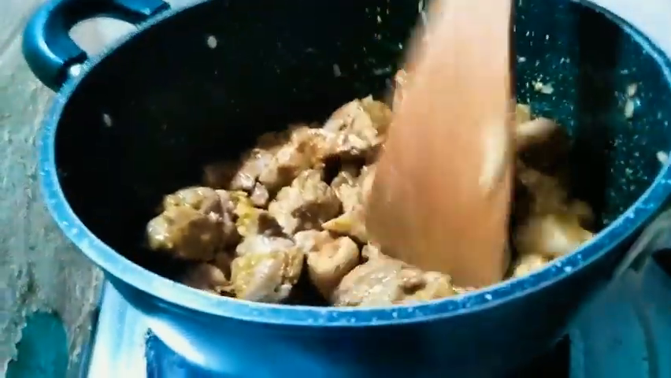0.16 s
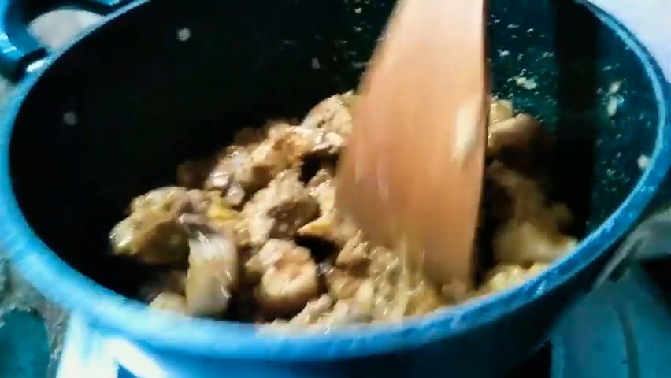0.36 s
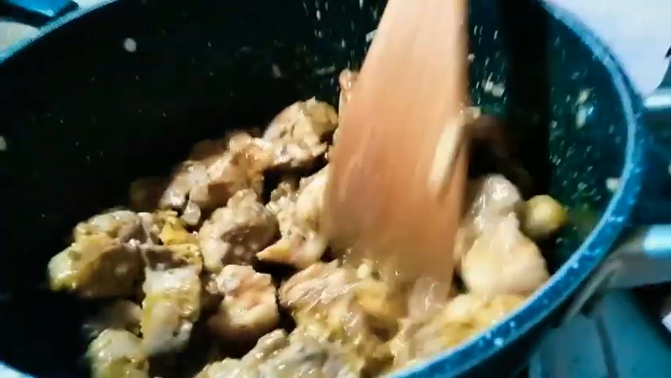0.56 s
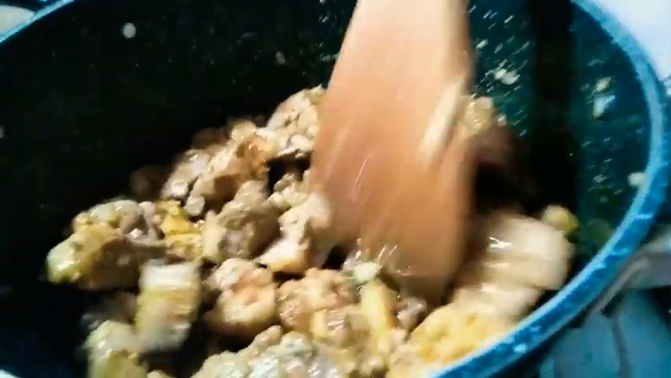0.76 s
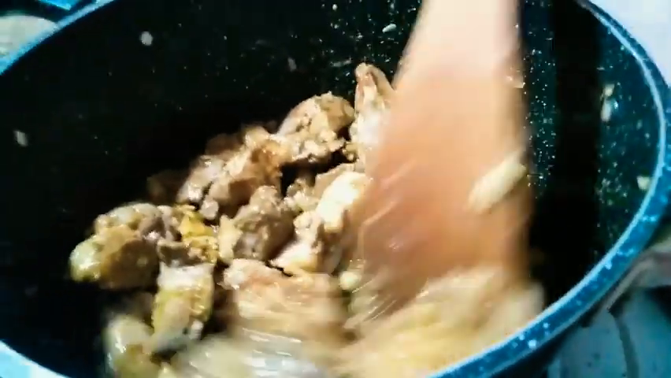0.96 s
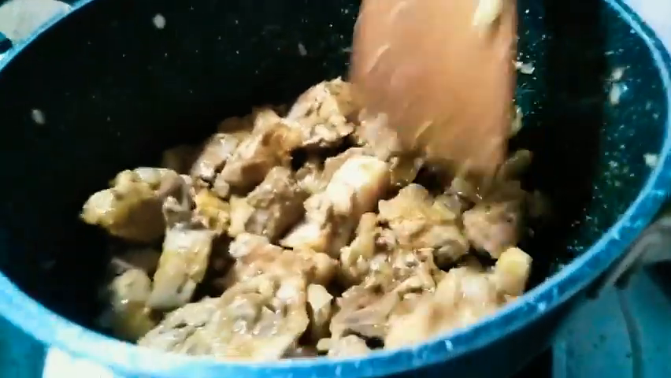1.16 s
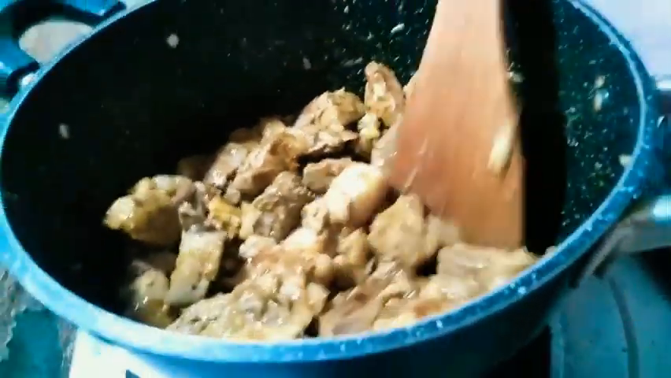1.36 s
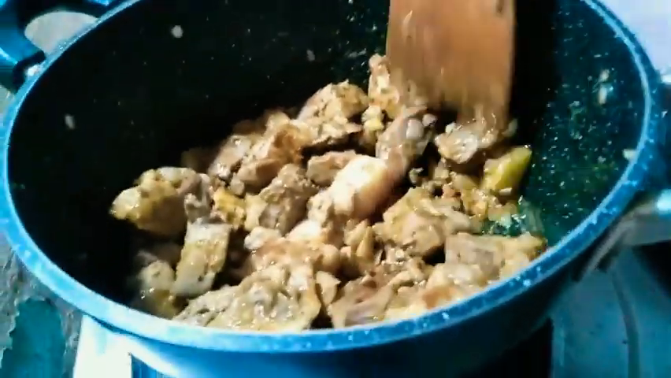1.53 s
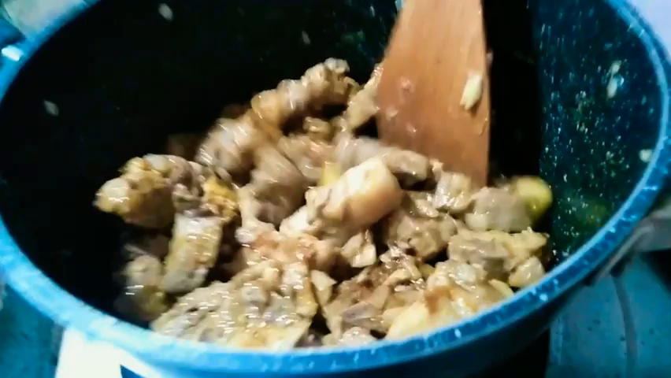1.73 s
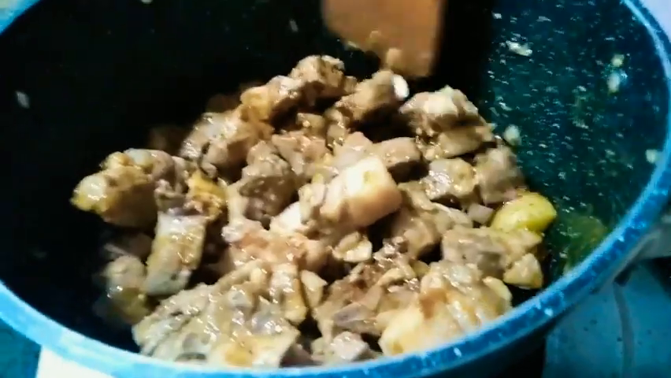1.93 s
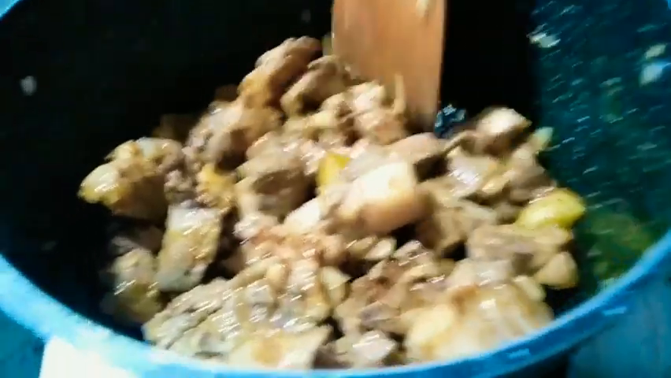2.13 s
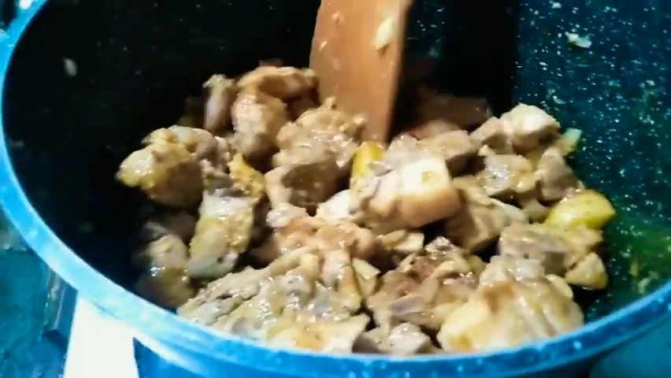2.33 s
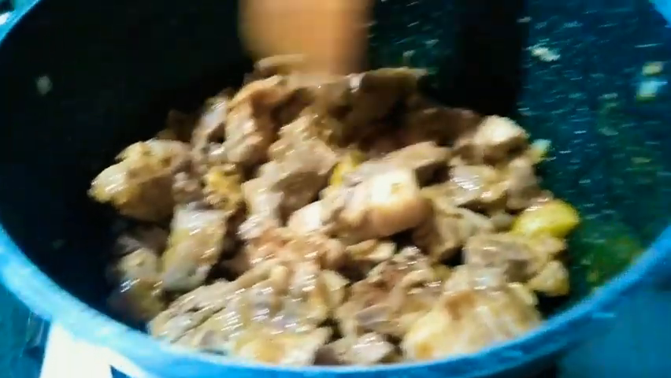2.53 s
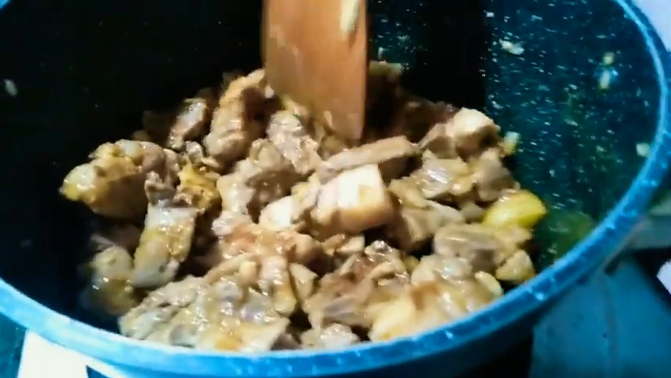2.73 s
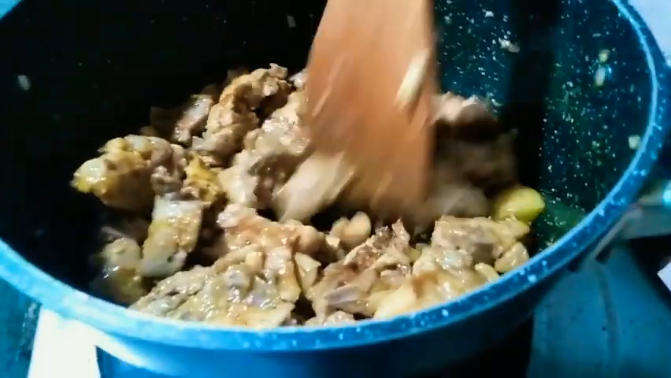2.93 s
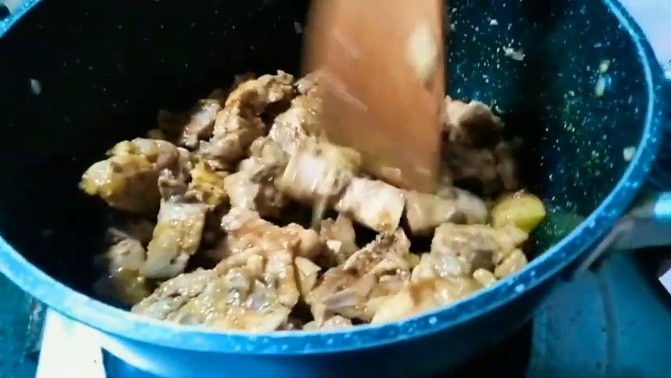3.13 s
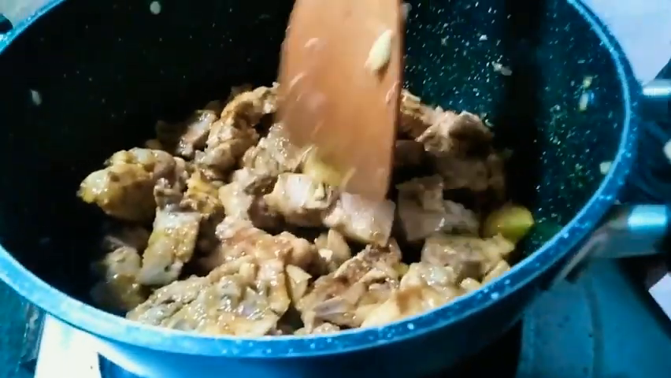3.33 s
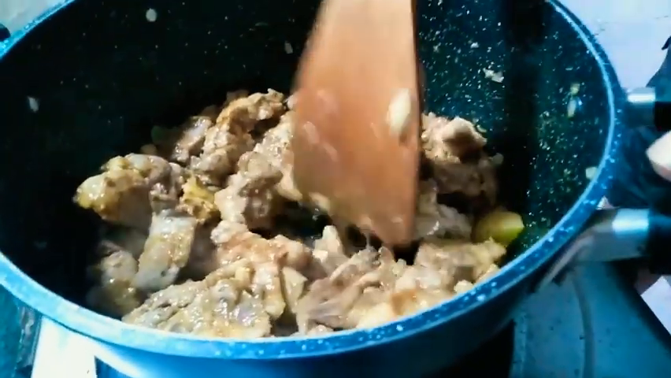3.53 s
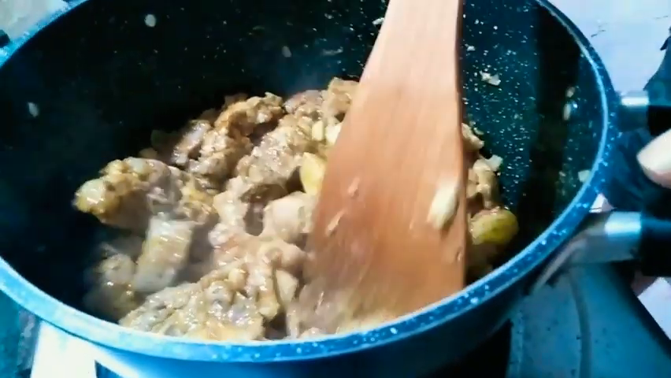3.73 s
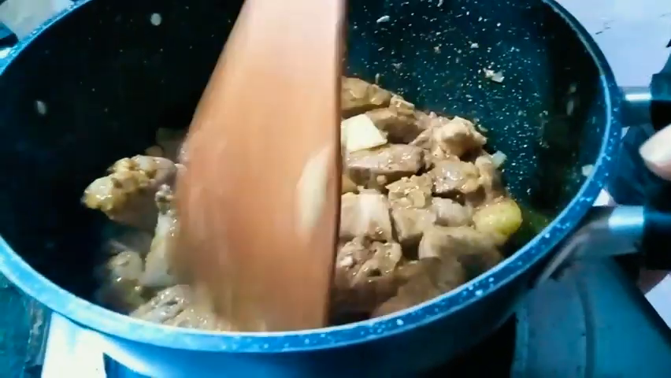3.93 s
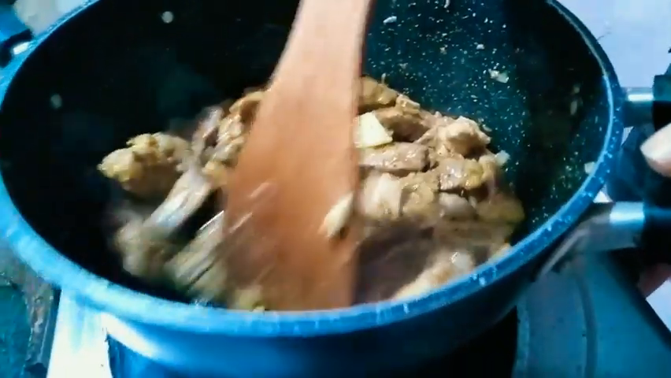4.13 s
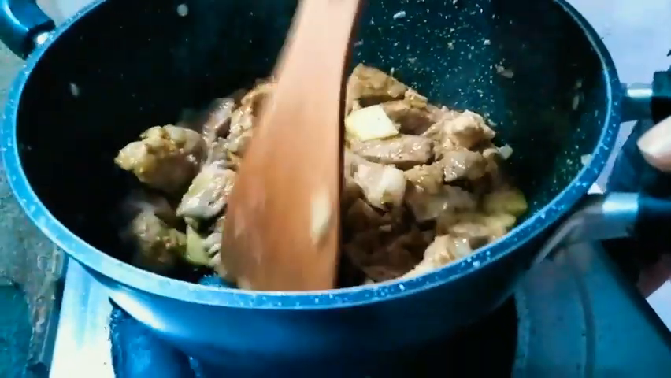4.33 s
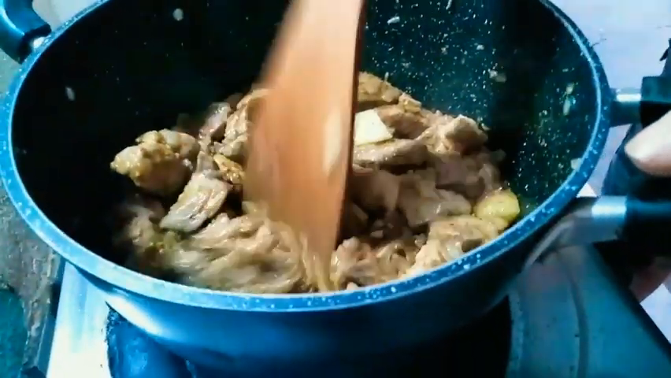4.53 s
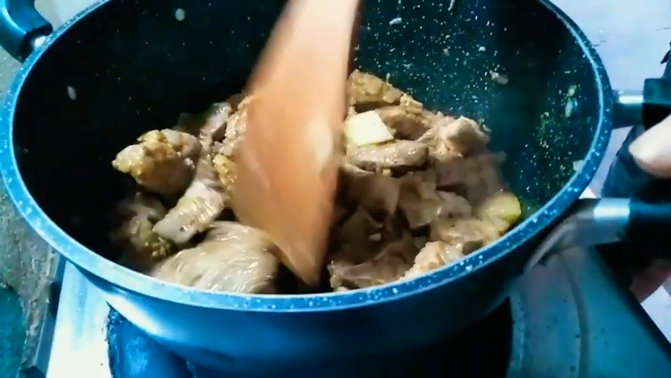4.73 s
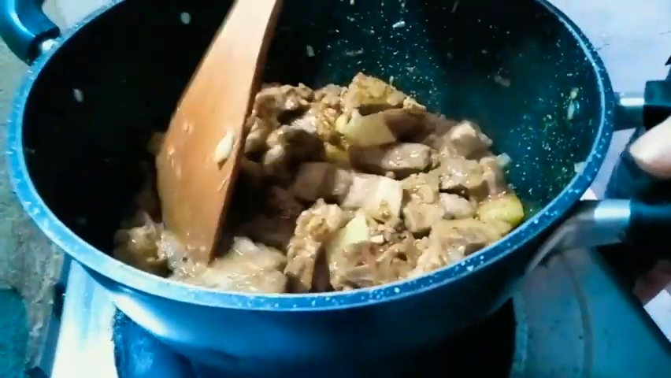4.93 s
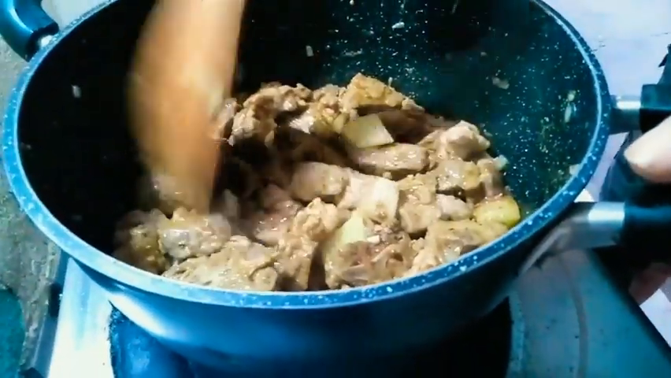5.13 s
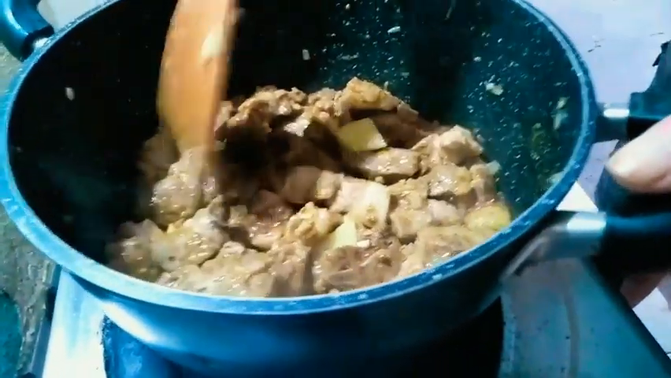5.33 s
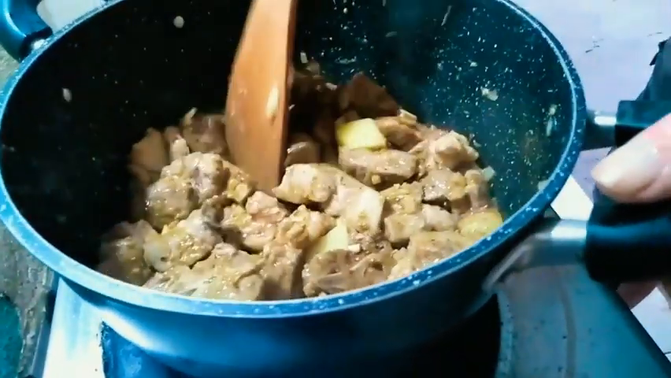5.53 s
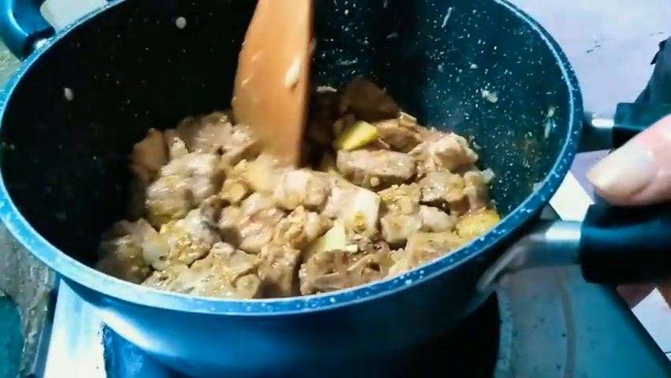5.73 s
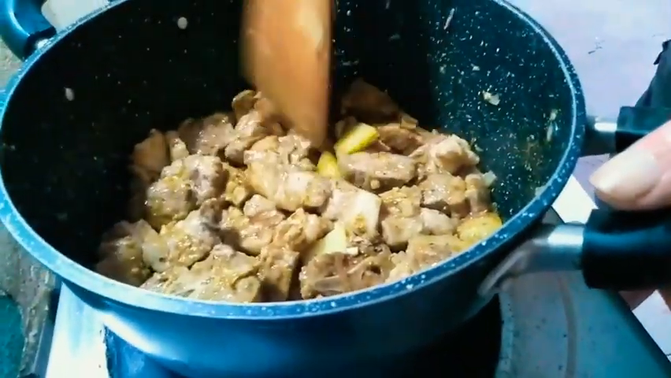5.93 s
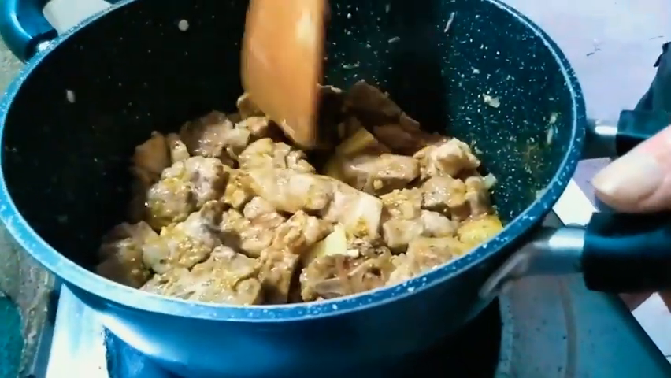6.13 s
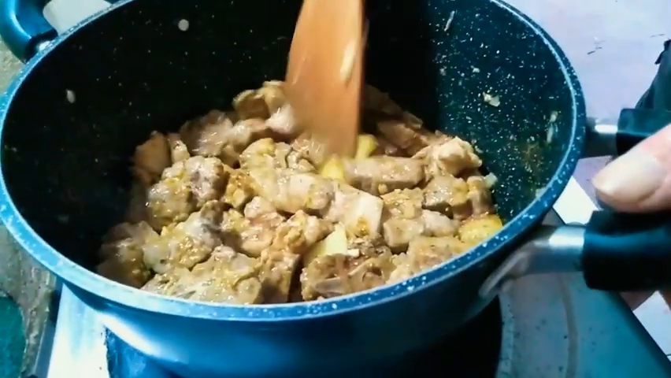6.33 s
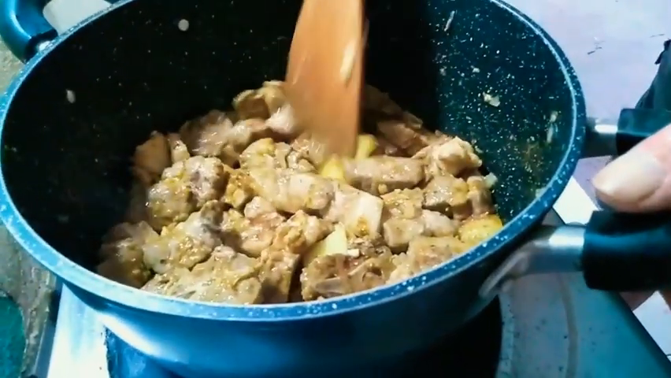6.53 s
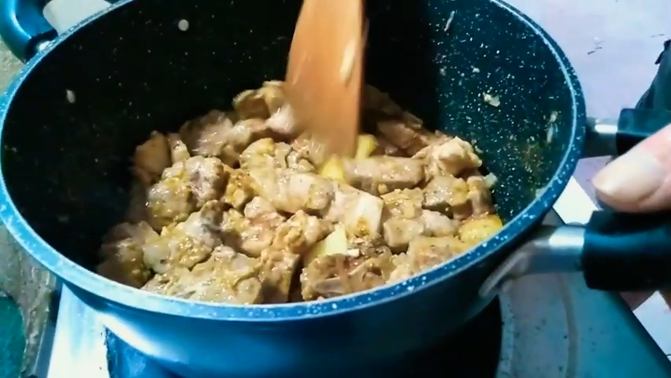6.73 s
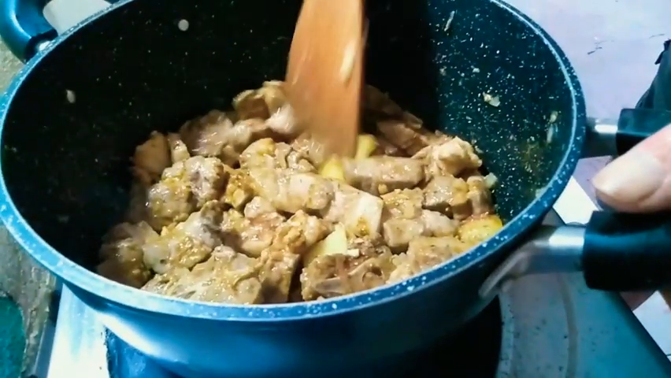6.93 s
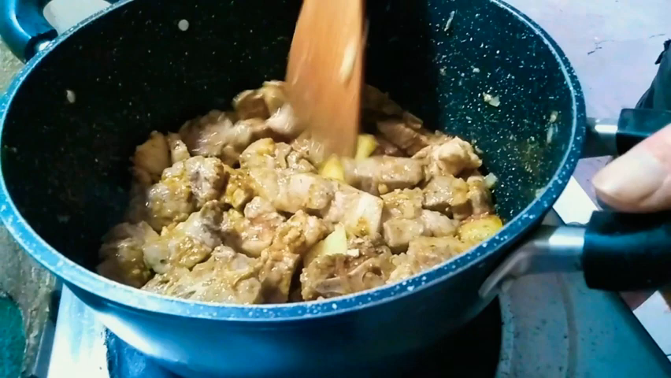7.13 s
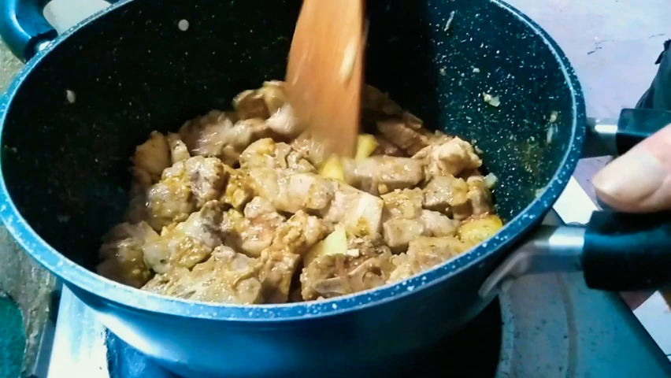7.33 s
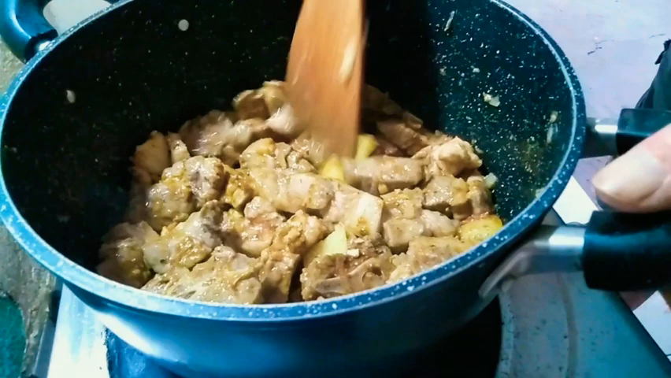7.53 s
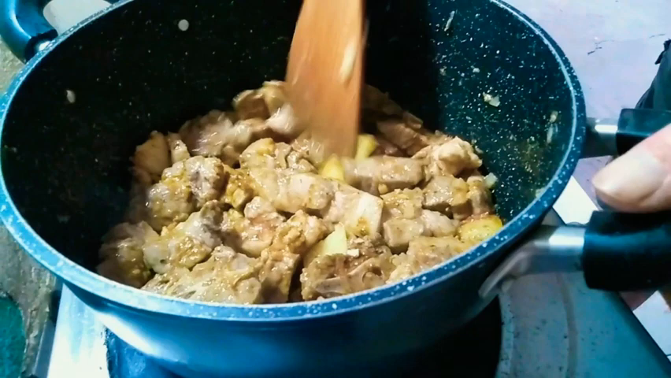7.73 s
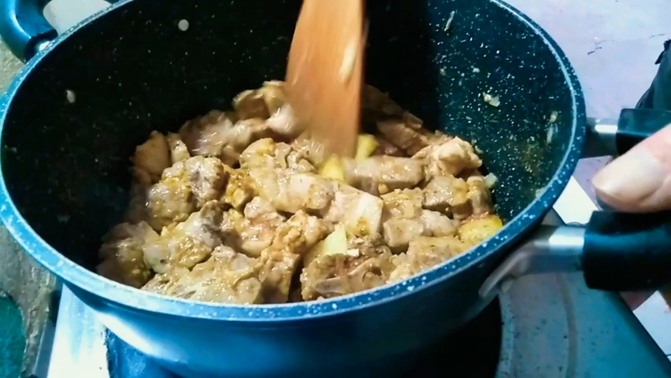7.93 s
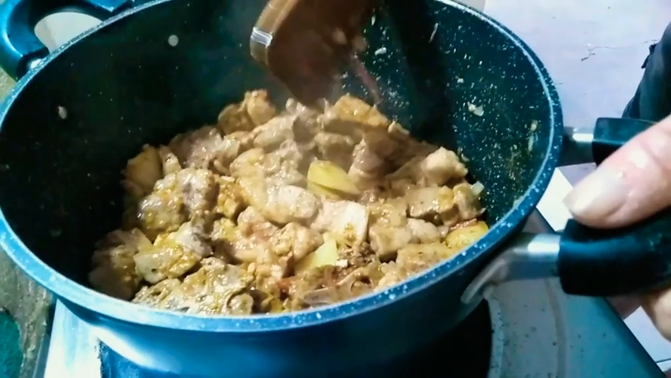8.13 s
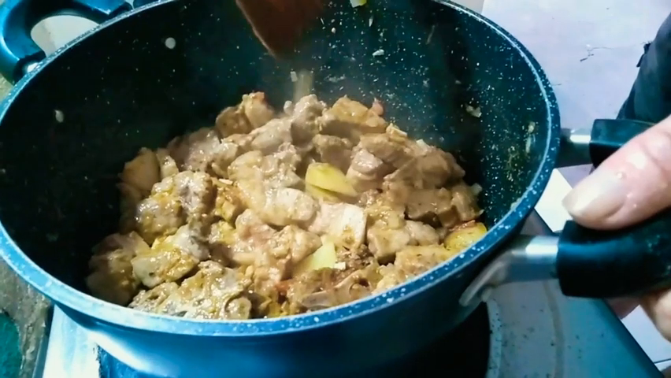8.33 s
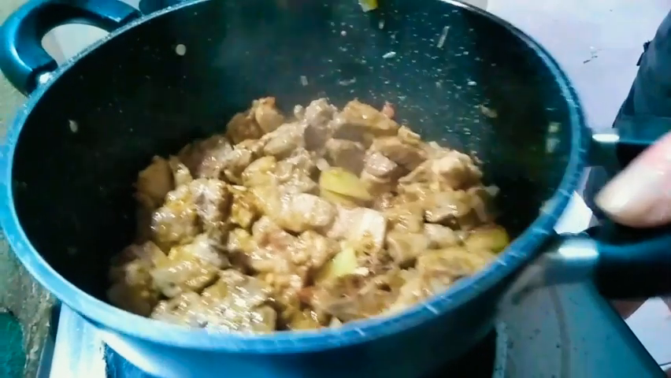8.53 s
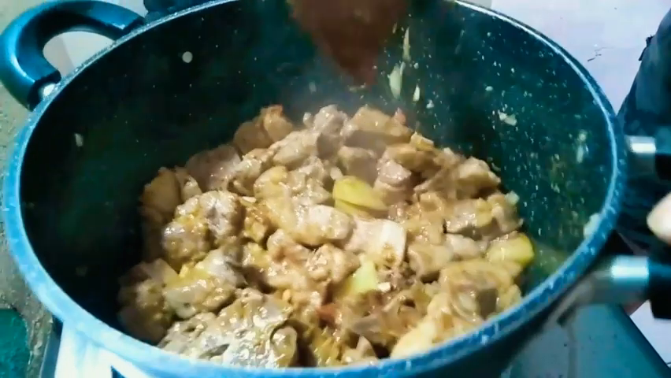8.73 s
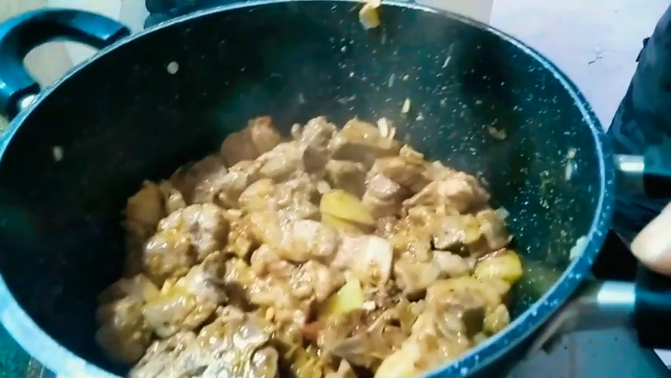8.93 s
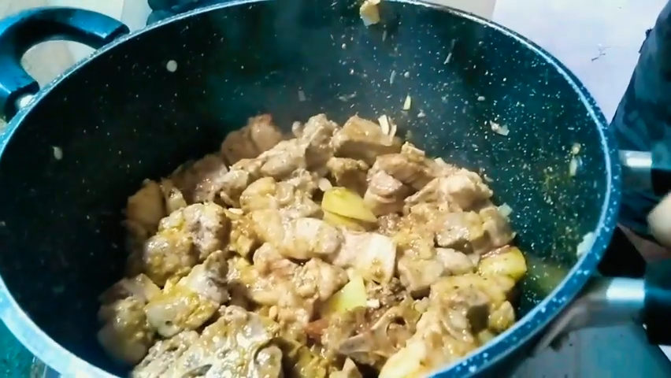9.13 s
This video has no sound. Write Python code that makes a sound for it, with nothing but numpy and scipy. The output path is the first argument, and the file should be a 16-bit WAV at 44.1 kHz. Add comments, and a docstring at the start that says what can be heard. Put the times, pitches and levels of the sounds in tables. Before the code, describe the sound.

Pieces of meat sizzle in a deep pot on a kitchen stove, close to the microphone. Juice bubbles and fat fizzes, flaring as a wooden spatula turns the meat, and single drops spit. The spatula bumps the pot four times, rests, then raps the rim three times so the pot rings briefly. The frying dips in level after the raps, over a low stove and room rumble.

```python
"""A kitchen stove, the microphone close to a deep pot in which pieces of meat sizzle.
Steam bubbles burst in juice and fat, flaring as a wooden spatula turns the meat; single drops spit.
The spatula bumps the pot four times, rests, then raps the rim three times, and the pot rings.
Stove and room rumble underneath. The recorder's gain control dips after the sharp raps."""
import sys
import numpy as np
from scipy import signal
from scipy.fft import rfft, irfft
from scipy.io import wavfile
from scipy.ndimage import uniform_filter1d

SR = 44100
rng = np.random.default_rng(int(sys.argv[2]) if len(sys.argv) > 2 else 0)


def materialize(psi):
    """Save the field psi as 16-bit PCM at rate SR to the path in sys.argv[1].

    A 1-D psi becomes a single channel; in a 2-D psi each row is a channel.
    """
    bounded = np.clip(np.atleast_2d(psi).T, -1, 1)
    quanta = np.round(bounded * 32767).astype(np.int16)
    wavfile.write(sys.argv[1], SR, quanta)


N = 408366
TIME = np.arange(N) / SR

# spectrum of stove and room: (frequency [Hz], level [dB])
RUMBLE_SPECTRUM = [(12, -11.5), (25, -8.5), (44, 6), (65, -3), (90, -6.5), (115, -18), (152, 0),
                   (178, -6.5), (205, -13), (235, -12), (280, -15.5), (400, -18), (800, -53)]
# resonances of the air in the pot and the room, colouring the bubbling juice and the fizzing fat: (frequency
# [Hz], width [Hz], level [dB])
JUICE_RESONANCES = [(415, 23, -3), (577.5, 46, 0), (682, 13, 4.5), (900, 160, -12), (1195, 190, 0.5),
                    (1726, 100, 0.5), (1936, 140, 0), (2730, 2320, -1.5), (4400, 370, -6)]
FAT_RESONANCES = [(6100, 2900, -22), (8163, 1045, -0.5), (15750, 2600, -7), (16260, 1140, 1.5)]
# the hollow between spatula and meat, shifting with the stirring: (time [s], pitch [Hz])
HOLLOW_PITCH = [(.9, 3400), (1.5, 2950), (2.3, 3070), (3.8, 2740), (4.7, 3550), (7.0, 3440), (9.26, 2720)]
# pushes of the spatula: (time [s], juice level [dB], fat level [dB], fade [s])
FRYING_FLARES = [(0.22, -43, -35.5, 0.076), (0.57, -44.5, -42, 0.15), (.94, -44, -41, .08),
                 (2.05, -40, -48, 0.04), (2.305, -40, -37, 0.11), (2.62, -40, -34, .035),
                 (2.885, -42, -48, 0.061), (3.722, -43, -42, 0.083), (4.02, -50, -40, 0.13),
                 (4.55, -47, -38, 0.059), (4.89, -44, -37.5, 0.084), (5.15, -44.5, -39, 0.097),
                 (5.72, -43, -50, 0.074), (6.41, -48, -42, 0.25), (6.84, -45, -43, 0.054),
                 (7.11, -39.5, -39, 0.073), (7.38, -45, -41, 0.052)]
# dull pats in the pot; the last two rows are the low lingering tail of the final rim rap:
# (time [s], level [dB], length [s], resonance [Hz])
DULL_PATS = [(0.46, -68, 0.063, 262), (1.283, -56.5, 0.068, 262), (1.31, -49, 0.067, 660),
             (4.05, -57.5, 0.09, 300), (4.144, -57, 0.13, 650), (4.15, -57, 0.14, 188),
             (5.36, -60.5, 0.098, 547), (6.837, -59.5, 0.033, 455), (6.953, -65.5, 0.52, 182),
             (8.482, -49.5, 0.07, 353), (8.711, -41.5, 0.07, 850), (8.79, -55.5, 0.14, 520)]
# spatula on the pot: (time [s], blow gain [dB], hardness cutoff [Hz], crack peak [dB], clack pitch [x])
SPATULA_KNOCKS = [(1.0209, -32, 1600, -48, 1.44), (1.6835, -7.5, 2450, -37, 0.92),
                  (3.4690, -14, 1720, -29, 0.89), (4.619, -15.5, 850, -65, 0.8),
                  (5.4150, -32, 2000, -40, 1.4), (5.4745, -12.5, 1010, -35, 0.96),
                  (7.3790, -35, 2500, -46, 0.77), (7.625, -40, 2500, -34, 1.07),
                  (8.1170, -9.5, 2700, -11, 1.01), (8.35, -29, 3950, -32, 3.03),
                  (8.391, -8, 2270, -10, 1.02), (8.672, -27.5, 2500, -55, 0.85),
                  (8.6919, -8, 2200, -9, 1.02)]
# damped wood on the wall, pot on its stand, thin bare rim: (frequency [Hz], level [dB], t60 [s])
CLACK_MODES = [(540, 3.5, 0.013), (642, 4.5, 0.012), (1177, -4.5, 0.012), (1544, 1.5, 0.0045),
               (1960, -0.5, 0.01), (2576, -8, 0.0087)]
POT_MODES = [(146, -30, 0.3), (234, -10, 0.22), (353.5, -9, 0.26), (419, -13, 0.6), (446, -4.5, 0.21),
             (514, -19.5, 0.36), (546, -8, 0.15), (574, -9.5, 0.22), (592, -3, 0.39), (691, 0.5, 0.19),
             (717.4, 1.5, 0.2), (752, -4.5, 0.33), (884, 2.5, 0.15), (1030, 0.5, 0.16), (1140, -10.5, 0.44),
             (1236, -4, 0.16), (1453, -2.5, 0.33), (1522, -4, 0.072), (1730, -14, 0.2), (1960, 0, 0.055),
             (2520, 3, 0.067), (4400, -10, .22)]
RIM_MODES = [(4320, -29, 0.18), (4415, -30, 0.22)]
# spectrum of wood cracking on the rim: (frequency [Hz], level [dB])
CRACK_SPECTRUM = [(130, -18), (300, 9.5), (700, -2), (1500, 6), (3100, -8), (4500, -1), (5600, -3.5),
                  (7000, 1), (8200, 7.5), (9500, 1), (11800, -9), (15500, -1)]
# single spits of fat: (time [s], peak level [dB])
FAT_SPITS = [(1.8292, -27), (2.3264, -28), (5.021, -28), (5.4151, -27), (6.4354, -25), (6.4642, -26),
             (6.4991, -30), (6.5929, -28), (7.2064, -28), (7.5852, -26), (7.8017, -27)]
# decay of the kitchen's reflections: (frequency [Hz], t60 [s])
KITCHEN_DECAY = [(150, 0.18), (500, 0.32), (1100, 0.25), (2800, 0.13), (8000, 0.1)]


def amp(db):
    """Decibels to gain."""
    return 10 ** (np.asarray(db) / 20)


def unit(x):
    """Scales to rms 1."""
    return x / np.sqrt(np.mean(x ** 2) + 1e-20)


def curve(points, hz):
    """Reads a table along a log-frequency axis."""
    f, value = np.transpose(points)
    return np.interp(np.log(hz + 1), np.log(f + 1), value)


def add(mix, s, sound):
    """Mixes a sound in at time s."""
    part = mix[max(round(s * SR), 0):][:len(sound)]
    part += sound[:len(part)]


def cut(x, hz, kind, order=2):
    """Butterworth low-pass or high-pass."""
    return signal.sosfilt(signal.butter(order, hz, kind, fs=SR, output="sos"), x)


def lag(x, seconds):
    """One-pole smoothing."""
    keep = np.exp(-1 / (seconds * SR))
    return signal.lfilter([1 - keep], [1, -keep], x)


def humps(resonances, hz):
    """Level in dB of overlapping resonances."""
    power = sum(amp(db) ** 2 / (1 + (2 * (hz - f) / width) ** 2) for f, width, db in resonances)
    return 10 * np.log10(power)


def colour(x, shape, table, size=8192):
    """Minimum-phase filter with the level shape(table, hz) in dB."""
    gain = amp(shape(table, np.fft.rfftfreq(size, 1 / SR)))
    cepstrum = irfft(np.log(gain))
    cepstrum[1:size // 2] *= 2
    cepstrum[size // 2 + 1:] = 0
    impulse = irfft(np.exp(rfft(cepstrum)))[:size // 2]
    return signal.oaconvolve(x, impulse)[:len(x)]


def resonate(x, hz, width_hz):
    """A complex resonance that follows hz; its imaginary part lags a quarter turn."""
    turn = np.exp(2j * np.pi * np.cumsum(hz * np.ones(len(x))) / SR)
    return 2 * turn * lag(x / turn, 1 / (np.pi * width_hz))


def wander(rate_hz):
    """Slow random drift of rms 1."""
    hz = np.fft.rfftfreq(N, 1 / SR)
    return unit(irfft(rfft(rng.standard_normal(N)) * (hz > 2) * np.exp(-hz / rate_hz), N))


def pops(per_s, spread_db):
    """Random clicks, many small and a few large."""
    size = amp(spread_db * np.minimum(rng.exponential(1, N), 5))
    return unit(size * rng.choice([-1, 1], N) * (rng.random(N) < per_s / SR))


def ring(modes, t):
    """Decaying sines; neighbouring modes swing in opposite directions."""
    return sum((-1) ** k * amp(db - 60 * t / t60) * np.sin(2 * np.pi * hz * t)
               for k, (hz, db, t60) in enumerate(modes))


def pot_echoes(clicks, fade_s):
    """Each click starts elsewhere in the pot, so its echoes are a fresh puff of noise."""
    return rng.standard_normal(len(clicks)) * np.sqrt(lag(clicks ** 2, fade_s))


def kitchen(x, build_s=0.001):
    """Dense reflections reach the microphone from pot wall, counter and tiles; the treble dies first."""
    count = SR // 2
    hz, t, bands = signal.stft(rng.choice([-1., 1.], count), SR, nperseg=256)
    decay = amp(-60 * t / curve(KITCHEN_DECAY, hz)[:, None])
    tail = signal.istft(bands * decay, SR, nperseg=256)[1][:count]
    tail *= 1 - np.exp(-(TIME[:count] / build_s) ** 2)
    spectrum = rfft(tail)
    spectrum /= np.sqrt(uniform_filter1d(abs(spectrum) ** 2, size=120))  # equal energy in every band
    return signal.oaconvolve(x, irfft(spectrum)[:count // 2])[:len(x)]


def rumble(level_db=-56.5):
    """Room tone: the steady low noise of stove and kitchen."""
    return amp(level_db) * unit(colour(rng.standard_normal(N), curve, RUMBLE_SPECTRUM))


def bubbling_juice(flurries):
    """Larger steam bubbles burst in the juice, heard through the hollow under the spatula."""
    bubbles = pops(per_s=2500, spread_db=2.0) * amp(0.2 * flurries + 0.95 * wander(rate_hz=3.9))
    bubbles = bubbles + 0.83 * pot_echoes(bubbles, fade_s=0.0081) + 0.5 * kitchen(bubbles)
    juice = colour(bubbles, humps, JUICE_RESONANCES)
    hollow_hz = np.interp(TIME, *np.transpose(HOLLOW_PITCH))
    # the hollow adds to the sound below its pitch and cancels it just above
    juice = juice + 0.302 * resonate(juice, hollow_hz, width_hz=940).imag
    return unit(cut(cut(juice, 468, "high", order=3), 5000, "low"))


def fizzing_fat(flurries):
    """Tiny steam bubbles burst by the thousand in the fat: a bright fizz."""
    bubbles = pops(per_s=9000, spread_db=2.5) * amp(0.87 * flurries + 0.22 * wander(rate_hz=28))
    bubbles = bubbles + 0.5 * pot_echoes(bubbles, fade_s=0.011) + 0.23 * kitchen(bubbles)
    return unit(cut(colour(bubbles, humps, FAT_RESONANCES), 1900, "high"))


def sizzle(juice_db=-45.5, fat_db=-39.0, juice_fall_db_per_s=0.11, fat_fall_db_per_s=0.3751):
    """Juice and fat fry in shared flurries and die down slowly as the meat dries."""
    flurries = wander(rate_hz=23)
    juice_flare, fat_flare = flares()
    juice_gain = np.hypot(amp(juice_db - juice_fall_db_per_s * TIME), juice_flare)
    fat_gain = np.hypot(amp(fat_db - fat_fall_db_per_s * TIME), fat_flare)
    return bubbling_juice(flurries) * juice_gain + fizzing_fat(flurries) * fat_gain


def flares(rise_s=0.011):
    """Each push lays wet meat on hot metal: the gains of juice and fat leap up, then fade."""
    juice, fat = np.zeros(N), np.zeros(N)
    t = TIME[:SR]
    for s, juice_db, fat_db, fade_s in FRYING_FLARES:
        shape = (1 - np.exp(-t / rise_s)) * np.exp(-t / fade_s)
        add(juice, s, amp(juice_db) * shape)
        add(fat, s, amp(fat_db) * shape)
    return juice, fat


def dull_pats():
    """Clusters of dull pats in the pot; the last two are the low lingering tail of the final rim rap."""
    pats = pops(per_s=820, spread_db=4.5)
    out = np.zeros(N)
    for s, db, length_s, hz in DULL_PATS:
        cluster = pats[round(s * SR):][:round(length_s * SR)]
        cluster = resonate(cluster, hz, width_hz=0.5 * hz).real
        dull = unit(cut(cluster, 0.93 * hz, "low"))
        add(out, s, amp(db) * dull * signal.windows.cosine(len(dull)))
    out = cut(out, 130, "high")
    return 1.66 * out + 1.8 * kitchen(out)


def wall_blow(t, hardness_hz, pitch):
    """Wood clacks on the wall; pot and kitchen ring on. A soft contact leaves the high modes still."""
    clack = cut(amp(-2) * ring(CLACK_MODES, t * pitch), 320, "high")
    echoes = amp(-1.55) * kitchen(cut(clack, 320, "high"))
    pot_ring = amp(-24.05) * ring(POT_MODES, t)
    return cut(clack + echoes + pot_ring, hardness_hz, "low", order=3)


def rim_crack(t):
    """The wooden edge clicks on the rim and skids in a brief chatter; peak 1."""
    click = 1.64 * np.exp(-t / 0.00006)
    skid = rng.standard_normal(len(t)) * (1 - np.exp(-t / 0.0019)) * np.exp(-t / 0.0055)
    contact = click + skid
    crack = colour(contact + 0.97 * pot_echoes(contact, fade_s=0.015), curve, CRACK_SPECTRUM)
    return crack / abs(crack).max()


def knocks(thud_hz=135, settle_at_s=8.83):
    """The spatula strikes the pot: cushioned by meat it is dull, on the bare rim it cracks."""
    t = TIME[:SR // 2]
    out = np.zeros(N)
    for s, blow_db, hardness_hz, crack_db, pitch in SPATULA_KNOCKS:
        blow = amp(blow_db) * wall_blow(t, hardness_hz, pitch)
        crack = amp(crack_db) * rim_crack(t)
        rim = amp(crack_db) * ring(RIM_MODES, t)
        push = amp(blow_db - 23) + amp(crack_db - 19.5)  # the pot presses on the stove
        thud = push * np.sin(2 * np.pi * thud_hz * t) * np.exp(-t / 0.0046)
        add(out, s, blow + rim + crack + 0.31 * kitchen(crack) + thud + 1.27 * kitchen(thud))
    add(out, settle_at_s, settling_hum(t))
    return cut(out, 76, "high")


def spits(fade_s=0.0009):
    """Single drops of water burst in the fat with a short, dry tick."""
    t = TIME[:512]
    out = np.zeros(N)
    for s, db in FAT_SPITS:
        burst = rng.standard_normal(len(t)) * np.exp(-t / fade_s)
        tick = cut(colour(burst, humps, FAT_RESONANCES), 1800, "high")
        add(out, s, amp(db) * tick / abs(tick).max())
    return out + 0.5 * kitchen(out)


def settling_hum(t, hz=416, db=-42, t60_s=0.52, rise_s=0.031):
    """The pot hums briefly on its stand as it settles after the last rap."""
    return ring([(hz, db, t60_s)], t) * (1 - np.exp(-t / rise_s))


def gain_control(x, threshold_db=-34.5, excess_share=0.34, attack_s=0.021, recovery_db_per_s=10):
    """The recorder reacts most to treble: sharp raps push the frying down, and it creeps back."""
    treble = cut(x[0], 3000, "high", order=1)
    power = uniform_filter1d(treble ** 2, size=SR // 100)
    excess_db = np.maximum(10 * np.log10(abs(power) + 1e-12) - threshold_db, 0)
    recovery_db = recovery_db_per_s * TIME
    held_db = np.maximum.accumulate(excess_share * excess_db + recovery_db) - recovery_db
    return x * amp(-lag(held_db, attack_s))


def scene():
    """The pot stands close and straight ahead of the microphone, the same in both channels."""
    pot = sizzle() + spits() + knocks() + dull_pats() + rumble()
    return np.array([pot, pot])


def record(dry):
    """The recorder: gain control, then a steep band limit."""
    band_limit = signal.firwin(1023, cutoff=15850, window=("kaiser", 8), fs=SR)
    return signal.oaconvolve(gain_control(dry), band_limit[None], "same")


dry = scene()
out = record(dry)
materialize(out)
```